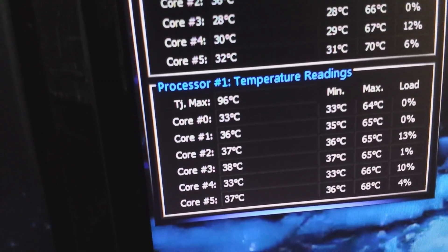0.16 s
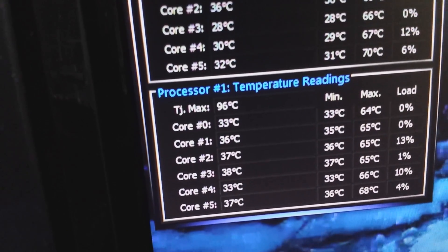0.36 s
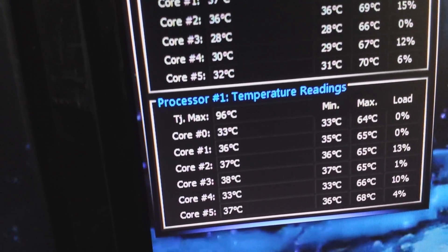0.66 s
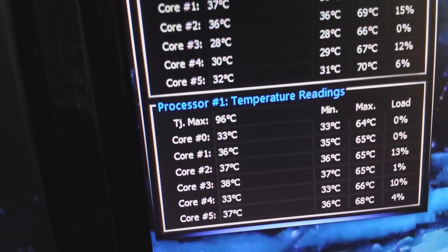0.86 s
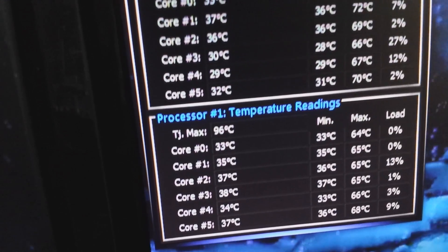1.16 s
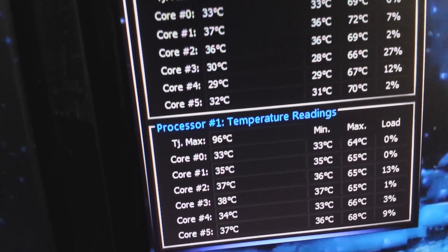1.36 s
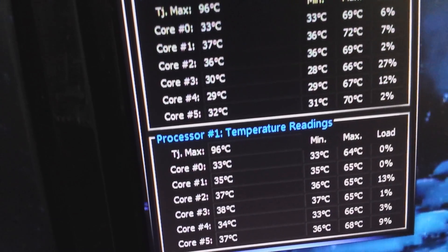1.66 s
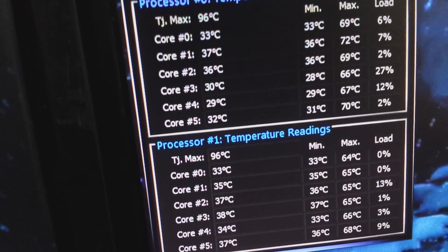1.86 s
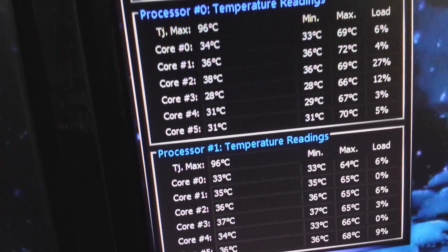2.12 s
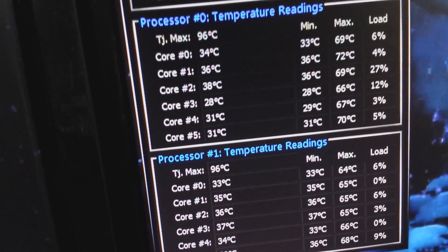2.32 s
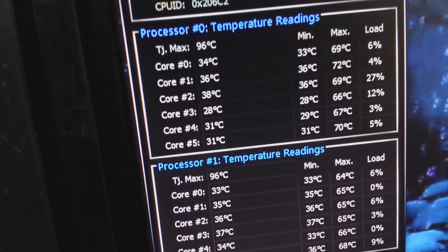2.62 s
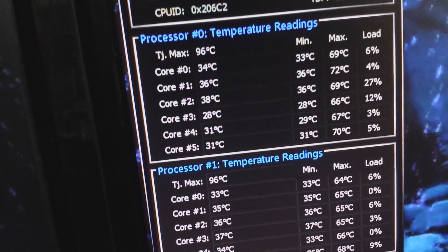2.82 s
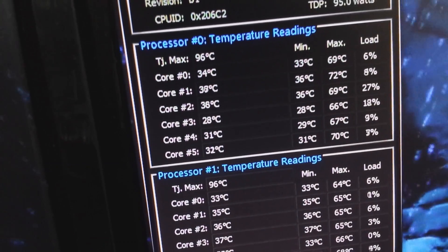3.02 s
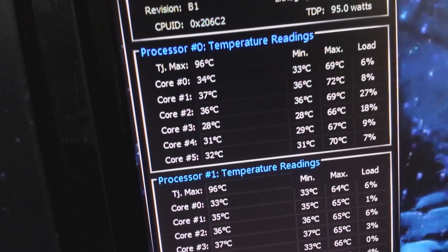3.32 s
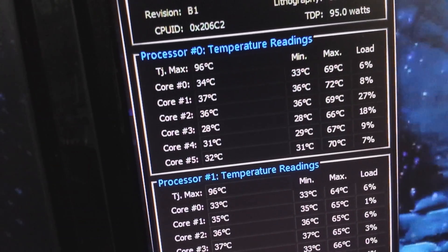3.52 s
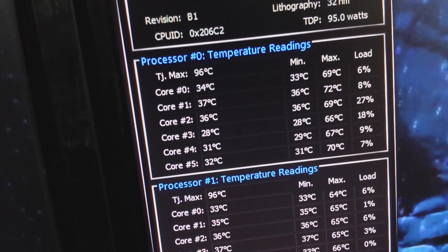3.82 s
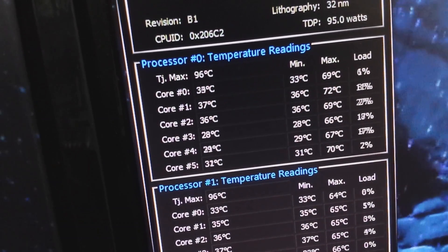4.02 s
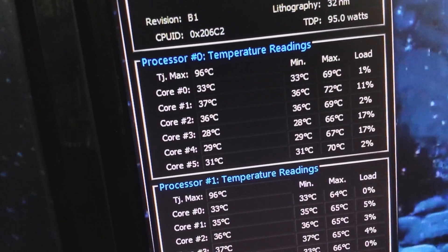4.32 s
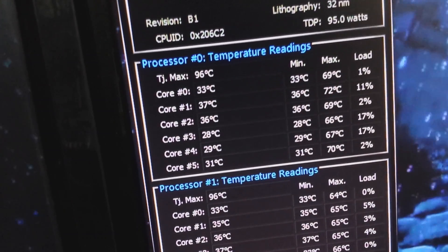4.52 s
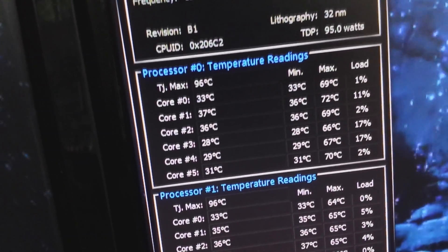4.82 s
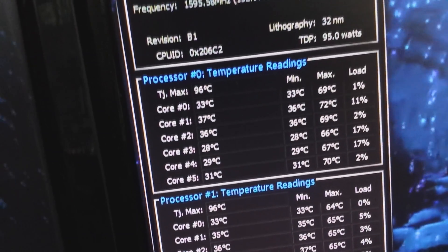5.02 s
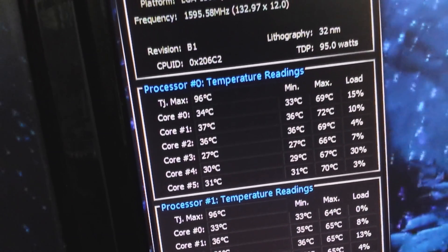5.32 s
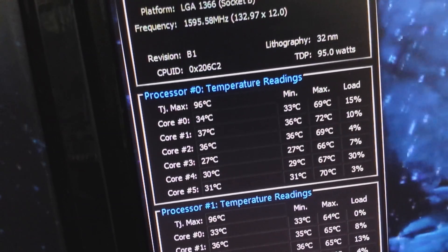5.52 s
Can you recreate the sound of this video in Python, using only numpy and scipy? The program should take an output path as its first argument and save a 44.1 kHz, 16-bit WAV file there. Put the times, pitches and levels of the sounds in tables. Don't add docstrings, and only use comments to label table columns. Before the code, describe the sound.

Computer fans hum steadily at full speed indoors, low tones slowly beating over soft air rush, with a faint high electric whine and tiny ticks.

```python
import sys
import numpy as np
from scipy import signal
from scipy.fft import rfft, irfft
from scipy.io import wavfile

SR = 44100
rng = np.random.default_rng(int(sys.argv[2]) if len(sys.argv) > 2 else 0)


def store_pcm(level_fs):
    pcm = np.round(np.clip(level_fs, -1, 1) * 32767).astype(np.int16)
    wavfile.write(sys.argv[1], SR, np.atleast_2d(pcm).T)


def voltage_ratio(decibels):
    exponent = np.asarray(decibels, float) / 20
    return 10 ** exponent


N = 250161

# f/Hz, level/dB per Hz, left minus right/dB, left-right likeness/0..1
AIR_COLOUR = [(15, -118, -7, 0.97), (40, -81.5, 9, .96), (60, -83.5, -3, 0.74), (90, -80.5, 5, 0.82),
              (146, -71, -3.5, 0.91), (179, -70, 5, 1), (223.5, -68.5, -7.5, 1), (241, -60, -0.5, 0.96),
              (321, -79.5, 4, 0.9), (335, -75, 3, 0.92), (410, -72.5, -6.5, 0.53), (395, -69, 3.5, 0.94),
              (506, -79.5, -4, 0.44), (614, -84.5, -1, 0.055)]
# f/Hz, level/dB per Hz, left minus right/dB, likeness/0..1
HIGH_AIR_COLOUR = [(620, -83, -2, .3), (642, -79.5, 2.5, 0.24), (924, -87.5, -0.5, 0),
                   (1110, -85.5, 7, 0.0073), (1493, -89, -2, 0), (1920, -93, -2.5, 0),
                   (2030, -88.5, -1.5, 0.087), (2547, -90, 0, 0.12), (4240, -91, -10, 0),
                   (4960, -91, -10, 0.14), (6410, -91, -3.5, 0.19), (9700, -99, -12.5, 1),
                   (9550, -101, -2, 0.32), (14400, -102, -3.5, 0)]
# f/Hz, width/Hz, level/dB
ROOM_DIPS = [(154, 3, -12), (216, 6.5, -2), (300, 5.2, -1.5), (392, 5.4, -4), (412.4, 2.5, -7),
             (483, 12, -8.5), (1675, 110, -0.5)]
# t/s, level/dB, f/Hz, time to fade by 60 dB/s
KNOCKS = [
    (4.15, -52, 54, .5),
    (1.15, -56, 1110, .12),
    (1.2, -58, 1080, .12),
]
# t/s, steps/count, gap between steps/s
MOTOR_BURSTS = [(.097, 1, 0), (.257, 2, .031), (.369, 5, .021), (.853, 2, .037), (1.091, 2, .025),
                (1.381, 3, .023), (1.57, 1, 0), (1.63, 3, .025), (1.914, 3, .022), (2.194, 4, .023),
                (2.665, 1, 0), (2.732, 3, .033), (2.831, 2, .018), (3.266, 3, .03), (3.632, 2, .03),
                (3.886, 4, .027), (4.207, 3, .019), (4.575, 1, 0), (4.749, 3, .023), (4.847, 1, 0),
                (5.094, 2, .029), (5.355, 3, .025)]
# t/s, twice the mean pulse rate f/Hz
WHINE_PITCH = [(0, 4096), (.8, 4111), (1.8, 4101), (2.6, 4086), (3.6, 4094), (4.7, 4088), (5.8, 4100)]
# f/Hz, level/dB
PULSE_COLOUR = [(2040, -23), (4080, -4), (6100, -4.5), (7100, -18), (7700, -6), (8800, -5), (10200, -12.5),
                (11100, -47), (11800, -10.5), (12200, -24), (12600, -3), (13100, -64), (14000, -7.5),
                (14500, -9)]
# t/s, peak level/dB
STRAY_PULSES = [
    (2.474, -31),
]
# t/s, fast fan turns per second f/Hz, slow fan tone f/Hz
FAN_SPEEDS = [
    (0, 60.14, 126.28),
    (3.0, 60.075, 126.17),
    (3.5, 60.28, 126.09),
    (5.67, 60.37, 125.95),
]
# t/s, blade tone gain level/dB
MIC_NEARNESS = [(0, -2), (.7, 0), (1.5, 1), (2.1, -1.5), (2.8, 1), (3.9, -0.5), (5.67, -2.5)]
# multiple of turn rate, level/dB, left minus right/dB, left lead/rad
MAIN_FAN_TONES = [(4, -48.2, .9, -.08), (8, -60, -3.5, 0), (14, -70, -3, 0), (20, -70.5, -1.8, .6),
                  (21, -68, -6, 1.0), (24, -66.5, -7.5, 1.2), (28, -78, -10, .5), (32, -76, 4, 0),
                  (35, -73, -3.4, -.6), (42, -80, -5, 0), (56, -82, 9, 0)]
# multiple of turn rate, level/dB, left minus right/dB, left lead/rad
FAST_FAN_TONES = [(6, -63, 3, 0), (8, -71, -1, 0), (14, -72, -3, .1)]
# f/Hz, level/dB
SPINDLE_AND_CASE = [(90, -65.5), (193.2, -60)]
# f/Hz, left level/dB per Hz, right level/dB per Hz
CAMERA_FLOOR = [(20, -115, -115), (1000, -107, -107), (1500, -102, -102), (2500, -99, -99),
                (4000, -95, -95), (6000, -97, -95), (7500, -97, -95), (9000, -101, -97),
                (11000, -98.5, -97), (14500, -99, -96.5)]


def in_time(rows):
    s, *columns = np.transpose(rows)
    return [np.interp(np.arange(N) / SR, s, c) for c in columns]


def in_hz(rows):
    hz, *columns = np.transpose(rows)
    log_hz = np.log(np.fft.rfftfreq(N, 1 / SR) + 1)
    return [np.interp(log_hz, np.log(hz), c) for c in columns]


def drift(rate_hz):
    r = np.exp(-80 * np.pi * rate_hz / SR)
    noise = rng.standard_normal(N // 40 + 4002)
    slow = signal.lfilter([1], [1, -2 * r, r * r], noise)[4000:]
    return np.interp(np.arange(N) / 40, np.arange(len(slow)), slow / slow.std())


def tone(hz, db, pan_db=0, lead=0, crest_s=None, wobble=.05):
    turns = np.cumsum(hz + np.zeros(N)) / SR
    start = rng.random()
    turns -= start if crest_s is None else turns[round(crest_s * SR)]
    angle = 2 * np.pi * turns + wobble * drift(3)
    side = np.array([[.5], [-.5]])
    level_db = db + side * pan_db + 8 * wobble * drift(4)
    return np.sqrt(2) * voltage_ratio(level_db) * np.cos(angle + side * lead)


def air():
    level_db, pan_db, alike = in_hz(AIR_COLOUR + HIGH_AIR_COLOUR[1:])
    alike = np.clip(alike, 0, 1)
    bins_hz = np.fft.rfftfreq(N, 1 / SR)
    for hz, width, db in ROOM_DIPS:
        level_db += db * np.exp(-((bins_hz - hz) / width) ** 2)
    mid, side = rfft(rng.standard_normal((2, N))) * np.sqrt(SR / 4)
    sign = np.array([[1], [-1]])
    mixed = np.sqrt(1 + alike) * mid + sign * np.sqrt(1 - alike) * side
    return irfft(voltage_ratio(level_db + sign * pan_db / 2) * mixed, N)


def knocks():
    out = np.zeros(N)
    for s, db, hz, t60 in KNOCKS:
        age = np.maximum(np.arange(N) / SR - s, 0)
        swell = 1 - np.exp(-age / (0.039 * t60))
        out += voltage_ratio(db - 60 * age / t60) * swell * 3 * np.sin(2 * np.pi * hz * age)
    return out


def focus_motor():
    level_db, level_spread_db = -46, 1.2
    pitch_hz, pitch_spread_hz, length_s = 3400, 70, .002
    out = np.zeros(N)
    age = np.arange(-300, 300) / SR
    for start, steps, gap in MOTOR_BURSTS:
        for k, (size, pitch) in enumerate(rng.standard_normal((steps, 2))):
            at = round((start + k * gap) * SR)
            hz = pitch_hz + pitch_spread_hz * pitch
            burst = np.exp(-(age / length_s) ** 2) * np.sin(2 * np.pi * hz * age)
            out[at - 300:at + 300] += voltage_ratio(level_db + level_spread_db * size) * burst
    return out


def pulse_train(at, height):
    taps = np.round(at)[:, None] + np.arange(-12, 13)
    away = taps - at[:, None]
    kernel = np.sinc(away) * np.cos(np.pi * away / 26) ** 2
    places = np.clip(taps, 0, N - 1).astype(int)
    return np.bincount(places.ravel(), (height[:, None] * kernel).ravel(), N)


def electric_whine():
    slip_s, jitter_s, size_db, smear_s = 2.8e-5, 3e-6, 1.3, 6e-4
    stumble_s, recover_s, edge_s = 2.474, 2.517, .003
    usual_share, stumble_share = .31, .95
    whine_db, stumble_db = -45, -10.5
    t = np.arange(N) / SR
    disorder = np.clip(np.minimum(t - stumble_s, recover_s - t) / edge_s + .5, 0, 1)
    share = usual_share + (stumble_share - usual_share) * disorder

    mean_hz = in_time(WHINE_PITCH)[0] / 2 + 4 + 5 * drift(40) + 2 * drift(6)
    count = np.arange(11900)
    chance, slip = rng.random(count.size), rng.exponential(1, count.size)
    shake, size = rng.standard_normal((2, count.size))
    at = np.cumsum(1 / np.interp(count, np.cumsum(mean_hz) / SR, mean_hz))
    share = np.interp(at, t, share)
    slips = slip_s * slip * (share / share[0]) ** 2 * (chance < share)
    mean_slip = slip_s * share ** 3 / share[0] ** 2
    at = (at - np.cumsum(slips - mean_slip) + jitter_s * shake) * SR
    train = pulse_train(at, voltage_ratio(size_db * size) * (at < N - 14))

    sweep = np.pi * smear_s * np.fft.rfftfreq(N, 1 / SR) ** 2 / 14000
    colour = voltage_ratio(in_hz(PULSE_COLOUR)[0]) * np.exp(-1j * sweep)
    out = irfft(rfft(train) * colour, N)
    out *= voltage_ratio(whine_db + stumble_db * disorder + 0.55 * drift(25)) / out.std()
    one_pulse = irfft(colour, N)
    for s, db in STRAY_PULSES:
        out += voltage_ratio(db) * np.roll(one_pulse, round(s * SR)) / one_pulse.max()
    return out


def fans():
    main_hz, small_hz, mains_hz = 33.184, 293.27, 60.022
    crest_s, slow_crest_s, mains_crest_s = 2.861, 2.8158, .1
    fast_hz, slow_hz = in_time(FAN_SPEEDS)
    near_db, = in_time(MIC_NEARNESS)
    out = tone(7 * main_hz, -41 + near_db, -1.7, -.11, crest_s)
    out += tone(4 * fast_hz, -46.5, -1.7, -.12, crest_s)
    out += tone(7 * fast_hz, -52 + near_db, -2.4)
    for k in (1, 2):
        for hz in (fast_hz, mains_hz):
            out += tone(k * hz, -64, .5, 0, mains_crest_s)
    out += tone(slow_hz, -50.5, .4, 0, slow_crest_s)
    out += tone(small_hz, -55, -1, .2) + tone(2 * small_hz, -74) + tone(3 * small_hz, -77, 5)
    for k, db, pan, lead in MAIN_FAN_TONES:
        out += tone(k * main_hz, db, pan, lead, crest_s if k == 4 else None, .03 + .008 * k)
    for k, db, pan, lead in FAST_FAN_TONES:
        out += tone(k * fast_hz, db, pan, lead, wobble=.3)
    for hz, db in SPINDLE_AND_CASE:
        out += tone(hz, db, wobble=.2)
    return out


def scene():
    electric = (electric_whine() + focus_motor()) * voltage_ratio(np.array([[-36], [0]]))
    return fans() + air() + knocks() + electric


def camera_rounding(x):
    size, offset = 1024, 820
    n, k = np.arange(2 * size)[:, None] + .5, np.arange(size) + .5
    window = np.sin(np.pi * n / size / 2)
    basis = np.sqrt(2 / size) * window * np.cos(np.pi / size * (n + size / 2) * k)
    ends = (2 * size - offset, 3 * size - (N - offset) % size)
    blocks = np.pad(x, ((0, 0), ends), "reflect").reshape(2, -1, size)
    lines = np.concatenate([blocks[:, :-1], blocks[:, 1:]], axis=2) @ basis

    hz, *sides = np.transpose(CAMERA_FLOOR)
    log_hz = np.log(k * SR / 2 / size)
    floor_db = np.array([[np.interp(log_hz, np.log(hz), db)] for db in sides])
    uneven = np.repeat(rng.standard_normal((2, lines.shape[1], size // 16)), 16, axis=2)
    step = 2 * np.sqrt(SR / 2) * voltage_ratio(floor_db + 2.6 * uneven)
    whole = np.floor((np.abs(lines) / step) ** .75 + .4054)
    lines = np.sign(lines) * step * whole ** (4 / 3)

    frames = lines @ basis.T
    out = frames[:, :-1, size:] + frames[:, 1:, :size]
    return out.reshape(2, -1)[:, size - offset:size - offset + N]


def band_limit(x):
    return signal.sosfilt(signal.butter(12, 14535, fs=SR, output="sos"), x)


def record(dry):
    mix = camera_rounding(dry - .0005)
    return band_limit(mix)


dry = scene()
out = record(dry)
store_pcm(out)
```